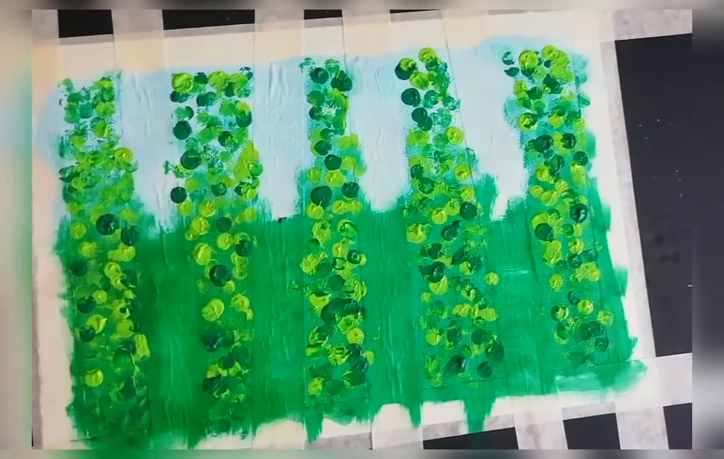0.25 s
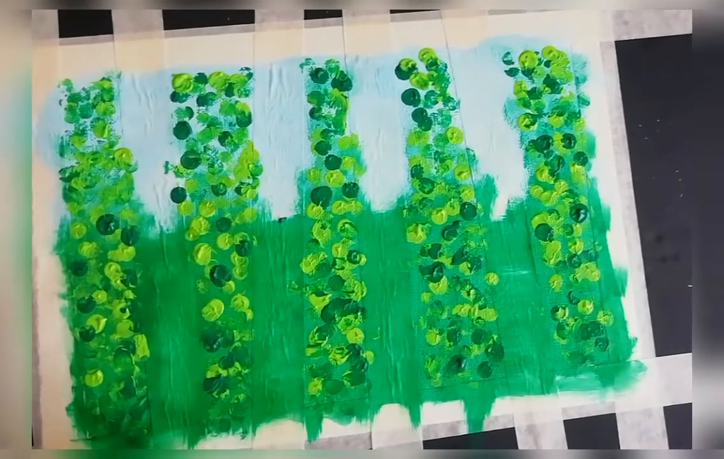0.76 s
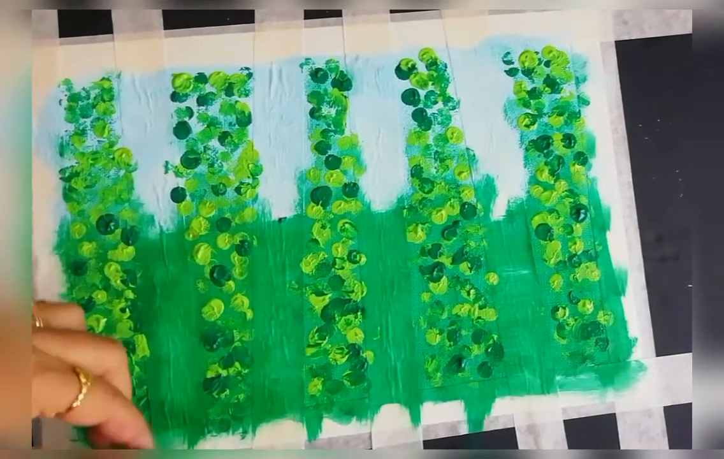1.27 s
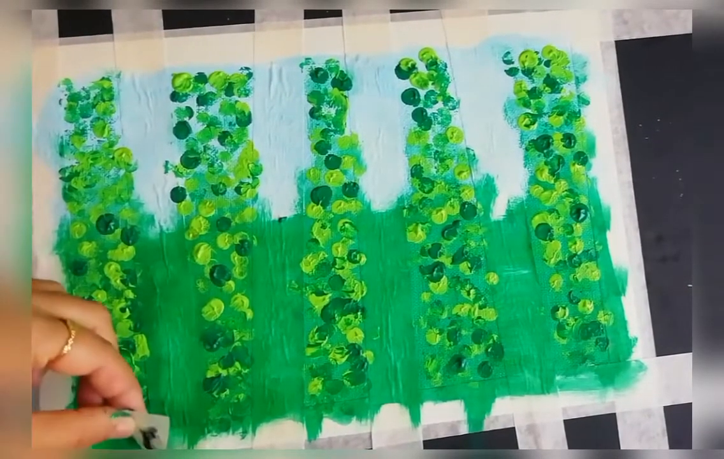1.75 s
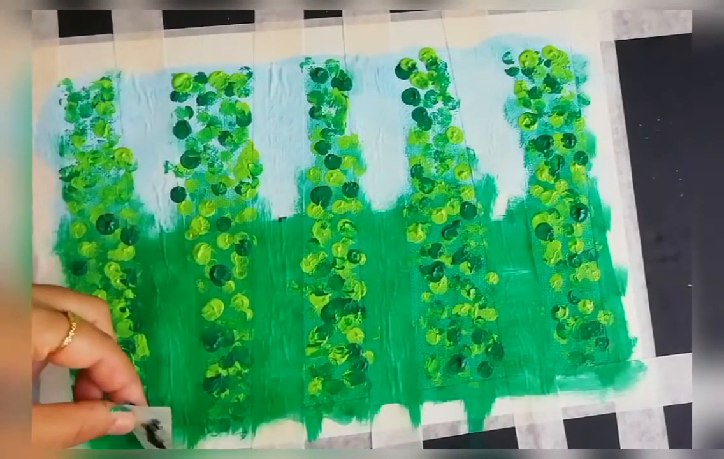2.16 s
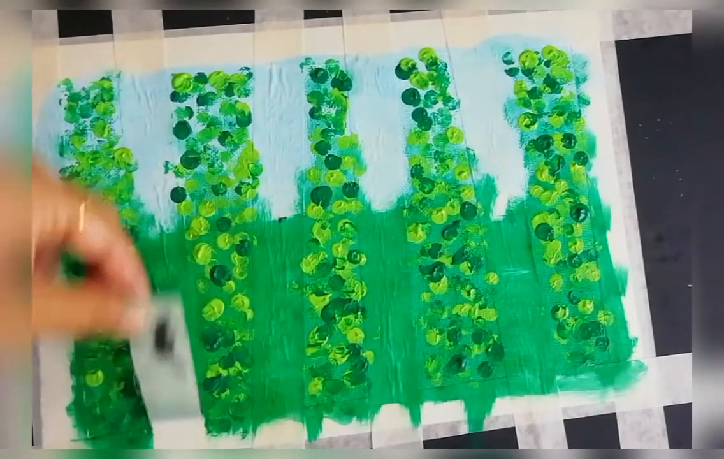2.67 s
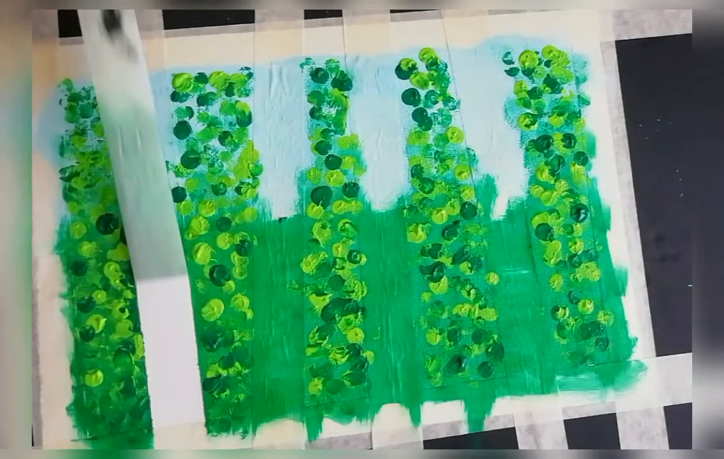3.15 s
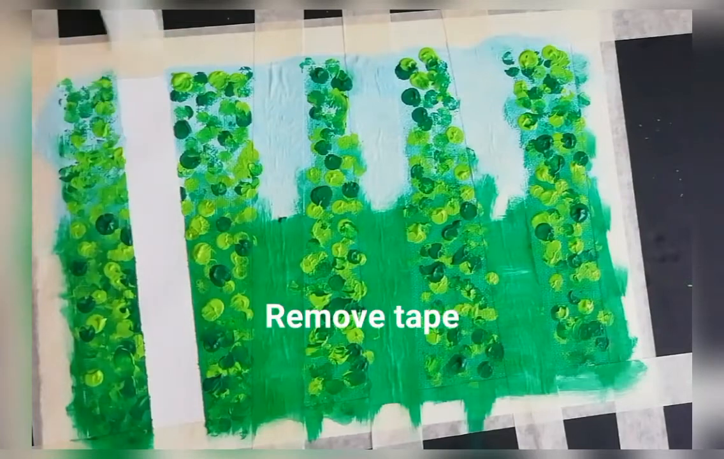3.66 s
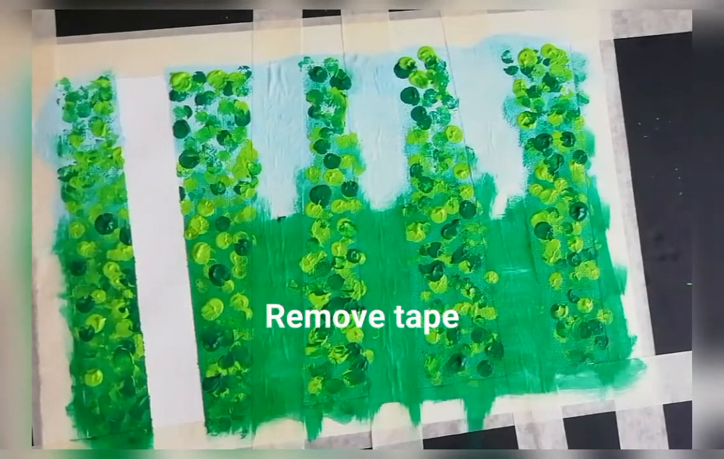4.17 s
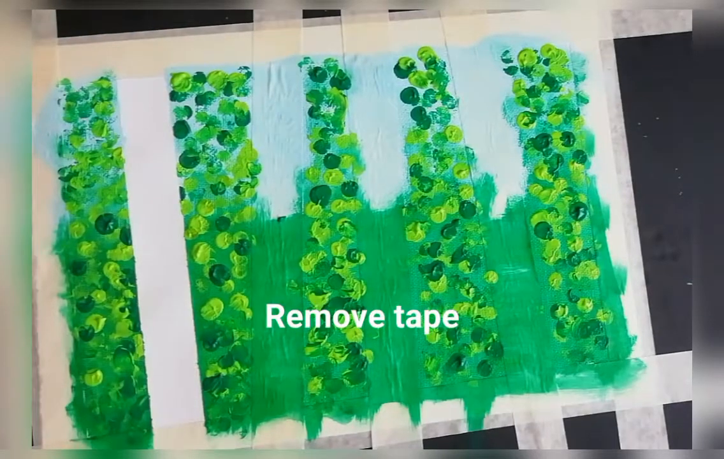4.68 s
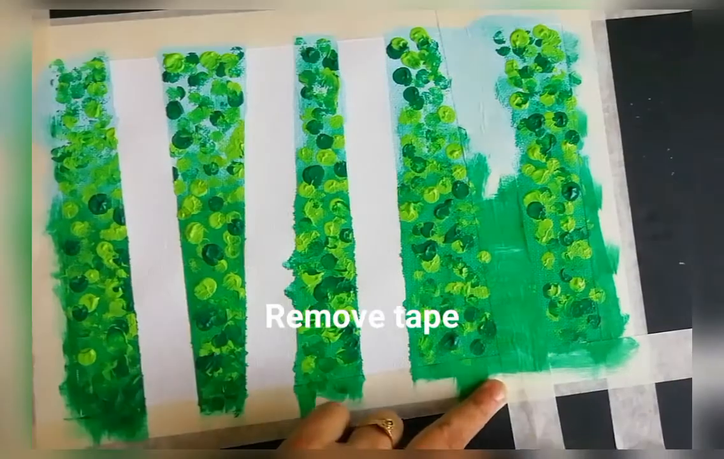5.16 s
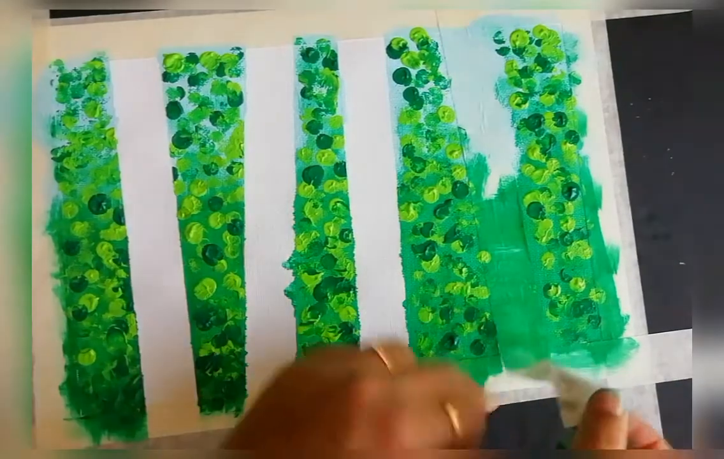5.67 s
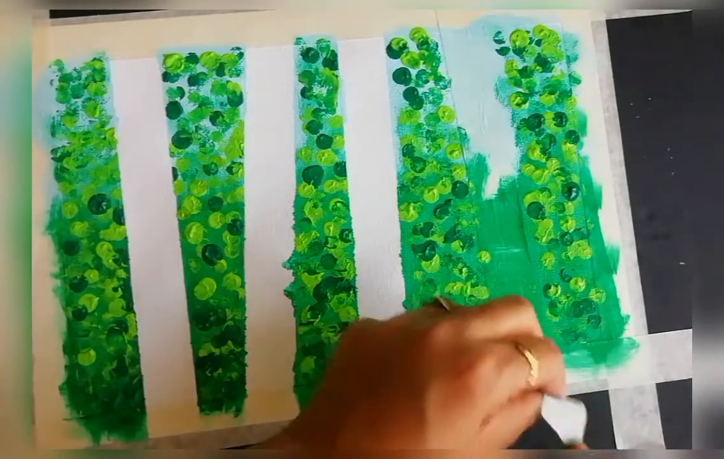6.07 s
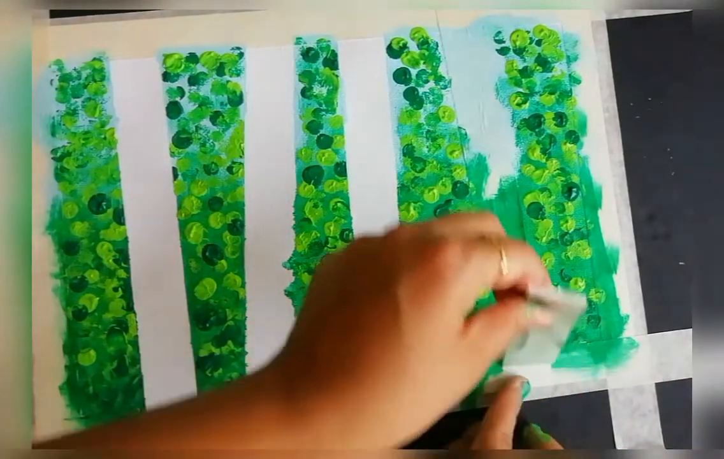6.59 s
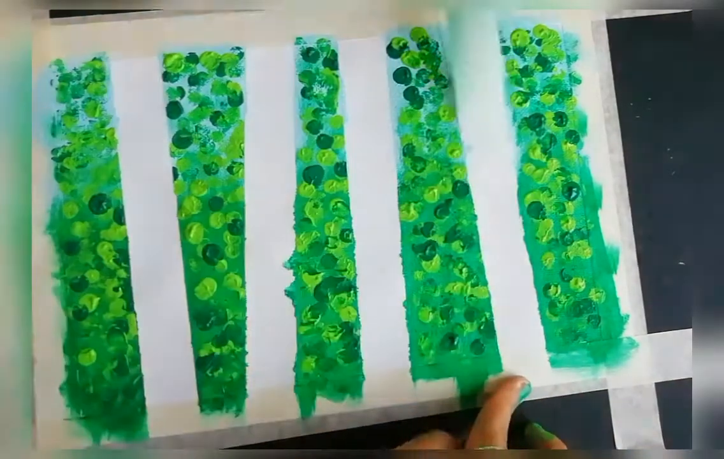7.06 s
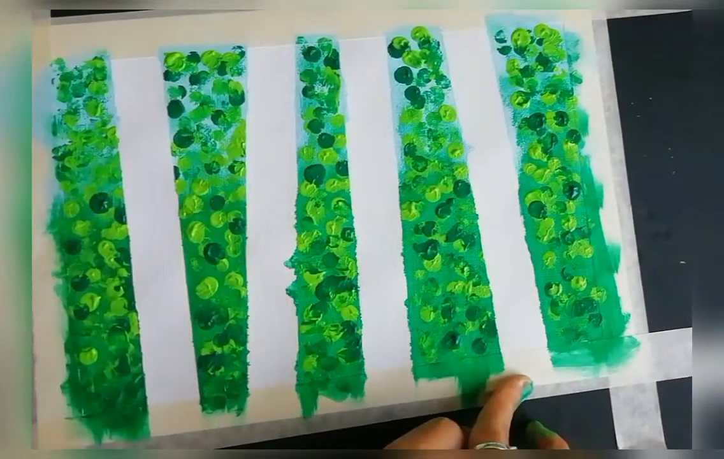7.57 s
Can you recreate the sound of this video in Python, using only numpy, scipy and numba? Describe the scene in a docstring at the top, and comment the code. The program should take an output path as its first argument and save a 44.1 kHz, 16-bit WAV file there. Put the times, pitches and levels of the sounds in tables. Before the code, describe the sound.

A close phone pickup of tape peeled from painted paper on a table in a small room, over quiet low rumble, hiss and faint wavering hum. From 0.25 to 0.8 s a grainy paper stroke swells into a tight cluster of crisp snaps and crinkle. Faint picking ticks and rubs follow from 1.4 to 2.1 s. At 2.6 s stronger snaps loosen the tape; from 2.9 to 3.8 s a long raspy, ringing peel grows faster and louder, ending in a bright crack and crinkle. Light rubbing and a soft double knock come near 4.4 s. A stroke swells from 5.0 s into sharp snaps at 5.4 s. Small ticks and knocks occur from 6.1 to 6.8 s. From 6.85 to 7.33 s a shorter, louder rip accelerates over dull board rumble; the freed strip rustles until 7.5 s, with a final knock and snap, then faint crinkling.

```python
"""A small room, at a table: masking tape is picked loose and ripped off a painted sheet, close to a phone.
Tiny slips of the glue, drawn at random, ring the taut strip and spit treble; a faster pull slips more often.
Corners snap free in single cracks, loose tape crinkles in runs of them, and the board is knocked dully.
Strokes over the paper hiss as grainy noise, sheet and board rumble low and dull under the hands, and the
freed strip rustles. Two microphone ports hear it over room rumble, hiss and a faint, wavering mains hum."""
import sys
import numpy as np
from scipy import signal
from scipy.fft import rfft, irfft
from scipy.io import wavfile
from scipy.ndimage import uniform_filter1d, map_coordinates
from numba import njit

SR = 44100
rng = np.random.default_rng(int(sys.argv[2]) if len(sys.argv) > 2 else 0)


def pcm_store(signal):
    """Save signal as 16-bit PCM."""
    levels = np.round(np.clip(np.atleast_2d(signal), -1, 1) * 32767)
    wavfile.write(sys.argv[1], SR, levels.astype(np.int16).T)


N = 345303
TIME = np.arange(N) / SR


def undb(db):
    """Decibels to gain."""
    return 10 ** (np.asarray(db) / 20)


def track(rows):
    """The columns of a curve after its time column, interpolated to one value a sample."""
    s, *columns = np.transpose(rows)
    return [np.interp(TIME, s, c) for c in columns]


def colour(x, points, unit=True, size=2048):
    """Causal minimum-phase filter through f/Hz, level/dB points; with unit, white noise keeps its power."""
    hz, db = np.transpose(points)
    bins = np.maximum(np.fft.rfftfreq(size, 1 / SR), 1)
    log_gain = np.log(undb(np.interp(np.log(bins), np.log(hz), db)))
    # folding the cepstrum onto positive times makes the filter causal
    cepstrum = irfft(log_gain)
    cepstrum[1:size // 2] *= 2
    cepstrum[size // 2 + 1:] = 0
    response = irfft(np.exp(rfft(cepstrum)))
    if unit:
        response /= np.linalg.norm(response)
    return signal.oaconvolve(np.atleast_2d(x), response[None], axes=1)[:, :N]


def noise(likeness):
    """White noise at the two ports; likeness is the share of power common to both."""
    share = np.clip(likeness, 0, 1)
    common = rng.standard_normal(N)
    separate = rng.standard_normal((2, N))
    return np.sqrt(share) * common + np.sqrt(1 - share) * separate


def waver(size):
    """Slow chance with a spread of 1, turning about every size samples."""
    slow = uniform_filter1d(uniform_filter1d(rng.standard_normal(N), size), size)
    return (slow - slow.mean()) / slow.std()


def slips(per_s, scatter_db, count=2400):
    """Random releases of unequal size, their power evened out over count samples as by a steady hand."""
    released = rng.random(N) < per_s / SR
    size = undb(scatter_db * np.clip(rng.standard_normal(N), -2, 2))
    power = released * size ** 2
    return np.sqrt(power / np.maximum(uniform_filter1d(power, count), 1e-9))


def linger(pulses, decay_s):
    """Envelope of the brief burst that follows each release; its amplitude falls to 1/e in decay_s."""
    keep = np.exp(-2 / (decay_s * SR))
    return np.sqrt(signal.lfilter([1 - keep], [1, -keep], pulses ** 2 + 1e-18))


def strike(s, rise_s, decay_s, count=4000):
    """Samples around a blow and its envelope: a quick exponential rise, then a decay."""
    at = np.clip(int(s * SR) + np.arange(-count // 10, count), 0, N - 1)
    t = TIME[at] - s
    return at, np.exp(np.minimum(t / rise_s, -t / decay_s))


def gestures(rows, attack_s, release_s, bend=1):
    """Gain of hand movements: each sets in, swells to its final level (early, if bent) and dies away."""
    gain = np.zeros(N)
    for start, end, final_db, swell_db in rows:
        at = slice(max(int(start * SR), 0), int((end + 10 * release_s) * SR))
        t = TIME[at]
        to_go = np.clip((end - t) / (end - start), 0, 1)
        attack = np.clip((t - start) / attack_s, 0, 1)
        release = np.exp(-np.maximum(t - end, 0) / release_s)
        gain[at] += attack * release * undb(final_db - swell_db * to_go ** bend)
    return gain


@njit
def moving_bandpass(x, hz, width):
    """State-variable band-pass with a moving centre."""
    y, band, low = np.empty(len(x)), 0., 0.
    for i in range(len(x)):
        g, damping = np.tan(np.pi * hz[i] / SR), width / hz[i]
        v = (band + g * (x[i] - low)) / (1 + g * (g + damping))
        band, low = 2 * v - band, low + 2 * g * v
        y[i] = damping * v
    return y


def resonate(x, hz, width_hz):
    """A moving resonance on both channels; white noise keeps its power."""
    filtered = np.array([moving_bandpass(c, hz, float(width_hz)) for c in x])
    return filtered * np.sqrt(SR / (np.pi * width_hz))


def narrow_bass(x, below_hz):
    """Long waves reach both ports alike."""
    high_pass = signal.butter(2, below_hz, "high", fs=SR, output="sos")
    side = signal.sosfilt(high_pass, (x[0] - x[1]) / 2)
    return x.mean(axis=0) + np.array([side, -side])


# spectrum of the empty room's rumble and air: f/Hz, level/dB
AIR_SPECTRUM = [(15, -34.5), (25, -8), (53, -4.5), (71, -14), (101, -8), (129, -21.5), (173, -13),
                (233, -21.5), (457, -35), (509, -37.5), (1200, -31.5), (2420, -36), (3170, -38),
                (15500, -51)]
# course of the upper hum tone, before a 2 dB lift: t/s, level/dB
HUM_COURSE = [(0.0, -66), (0.94, -63), (1.24, -89), (1.46, -61), (3.86, -64), (4.27, -82), (4.36, -54.5),
              (4.69, -66), (5.28, -53.5), (6.0, -75.5), (6.28, -64), (7.22, -71), (7.28, -59), (7.83, -63)]


def background():
    """Low room rumble, microphone hiss, and mains hum as two sines near 49 and 98 Hz, wavering in pitch."""
    air = narrow_bass(colour(noise(0), AIR_SPECTRUM, size=8192), below_hz=340)
    mains_hz = 49 + 25 * uniform_filter1d(rng.standard_normal(N), 4000)
    phase = 2 * np.pi * np.cumsum(mains_hz) / SR
    hum = undb(track(HUM_COURSE)[0] + 2) * np.sin(2 * phase) + undb(-65.5) * np.sin(phase)
    hiss = colour(noise(0), [(2000, -8), (8000, -8), (12000, 2), (15000, 0)])
    return undb(-62) * air + hum + undb(-76.5) * hiss


# strokes of fingers and loose tape over the paper, before a 3 dB cut:
# start t/s, end t/s, final level/dB, swell/dB (negative: fades)
STROKES = [(0.01, 0.2, -71, -13), (0.25, 0.815, -41, 29), (1.37, 1.56, -54.5, 21), (1.62, 1.78, -62, 5),
           (1.94, 2.12, -68, -1), (2.46, 2.58, -61, 17), (2.578, 2.88, -45.5, 0), (3.81, 3.93, -40.5, 1),
           (4.17, 4.33, -62, 11), (4.35, 4.405, -38.5, 12), (4.58, 4.62, -55.5, 3),
           (4.845, 5.05, -60.5, -2), (5.01, 5.42, -30.5, 28), (6.1, 6.26, -54.5, 14), (6.3, 6.68, -62, 1),
           (6.73, 6.78, -42.5, 0), (7.33, 7.55, -42.5, -14), (7.58, 7.79, -57.5, -1)]
# spectrum of the rubbed paper: f/Hz, level/dB
PAPER_SPECTRUM = [(300, -19.5), (700, -20.5), (1300, -13), (1900, -10.5), (2800, -2.5), (4000, -4.5),
                  (6300, -0.5), (7900, -8), (10000, -4.5), (13300, -5), (14800, 8), (15600, -19)]


def sliding():
    """Paper fibres catch and let go: a fine, grainy hiss; each stroke eases in and out."""
    stroke = gestures(STROKES, attack_s=.015, release_s=.015, bend=2.03)
    stroke = uniform_filter1d(stroke, size=1000)
    grain = linger(slips(3500, scatter_db=2), decay_s=.0006)
    return undb(-3) * colour(stroke * grain * noise(.21), PAPER_SPECTRUM)


# snaps of glue and creases, levels relative to their layers: t/s, crack level/dB, body level/dB
SNAP_EVENTS = [(0.283, -49.5, -75), (0.763, -29.5, -53), (0.7827, -23, -44), (0.787, -20.5, -44),
               (0.8, -30, -42), (0.812, -26, -36), (0.837, -20.5, -48), (1.4229, -52, -50.5),
               (1.4876, -42, -54), (1.551, -28, -51), (1.685, -44, -62), (1.715, -41.5, -52.5),
               (1.953, -56, -58.5), (2.5849, -23, -27.5), (2.652, -26.5, -35), (2.6774, -29, -28.5),
               (2.6921, -26, -30.5), (2.736, -28, -34), (2.7597, -25.5, -25.5), (3.075, -24.5, -24),
               (3.1428, -25, -32), (3.295, -26, -26), (3.4065, -22, -24), (3.5164, -27, -21),
               (3.694, -23, -27), (3.7887, -14.5, -18), (3.8093, -20.5, -37), (4.364, -46, -50),
               (4.402, -28.5, -49), (5.3759, -13, -37.5), (5.3855, -17, -30), (5.4078, -35, -22),
               (5.4235, -31, -20), (6.079, -50.5, -69.5), (6.1826, -39, -65), (6.2568, -26, -47),
               (6.2599, -20, -50), (6.694, -37, -40.5), (6.7398, -46, -39.5), (6.9227, -31, -19.5),
               (7.316, -28, -24), (7.5436, -33.5, -25.5)]
# spectrum of a crisp crack, also for crinkles: f/Hz, level/dB
CRISP_SPECTRUM = [(1180, -27.5), (2000, -18), (2370, -7), (3180, -2.5), (3460, -6), (5790, -1),
                  (6640, -1.5), (7680, -6.5), (13100, -1), (14600, -1.5), (15500, 3.5)]
# spectrum of the tape's backing, also for crinkles: f/Hz, level/dB
BODY_SPECTRUM = [(150, -19), (420, -24.5), (600, -22.5), (1100, -12.5), (1500, -6), (2200, 4.5),
                 (3000, 3.5), (4500, -6), (9000, -50.5)]
# spectrum of sizzle from the tape's thin edge, also for crinkles: f/Hz, level/dB
EDGE_SPECTRUM = [(8000, -36.5), (12000, -9), (14700, 9.5), (16000, -12)]
# the less body a snap has, the more its edge sizzles (dB per dB of crack over body)
SNAP_EDGE_DB, THIN_SHARE = -17, .5


def snapping():
    """Single snaps: a crack runs for about a millisecond, jerks the backing once and leaves a brief shiver."""
    cracks, shivers, ticks, jerks, edges = np.zeros((5, N))
    millisecond = np.sqrt(SR / 1000)  # gives one sample the energy of a millisecond at unit level
    for s, crack_db, body_db in SNAP_EVENTS:
        at, crack = strike(s, rise_s=.0007, decay_s=.0007)
        _, shiver = strike(s, rise_s=.0005, decay_s=.0062)
        cracks[at] += undb(crack_db) * (crack + undb(-20) * shiver)
        shivers[at] += undb(body_db - 7.5) * shiver
        onset = int(s * SR)
        ticks[onset] += undb(crack_db) * millisecond
        jerks[onset] += undb(body_db) * millisecond
        edge_db = crack_db + SNAP_EDGE_DB + THIN_SHARE * (crack_db - body_db)
        edges[onset] += undb(edge_db) * millisecond
    crisp = undb(4) * cracks * noise(.4) + undb(-3) * ticks
    body = undb(-1) * jerks + shivers * noise(.2)
    return colour(crisp, CRISP_SPECTRUM) + colour(body, BODY_SPECTRUM) + colour(edges, EDGE_SPECTRUM)


# dull low rumble of the sheet and board as hands rub, tug and lift, before a 3 dB cut:
# start t/s, end t/s, final level/dB, swell/dB (negative: fades)
RUMBLES = [(0.58, 0.83, -54.5, 13), (1.45, 1.68, -66, 4), (2.58, 2.87, -65, 3), (2.88, 2.96, -57, 0),
           (2.97, 3.7, -52.5, -1), (3.7, 3.81, -45.5, 4), (3.83, 3.93, -54, 2), (4.35, 4.41, -46, 2),
           (4.84, 5.2, -65, 3.5), (5.2, 5.38, -44, 5.5), (5.38, 5.52, -56.5, -7.5), (6.25, 6.6, -65.5, 1.5),
           (6.87, 7.03, -40, 8), (7.05, 7.27, -50, -4), (7.27, 7.54, -38.5, 7.5)]
# spectrum of the rumbling sheet and board: f/Hz, level/dB
RUMBLE_SPECTRUM = [(22, -14), (50, 2.5), (90, -4), (160, 4.5), (280, -4), (420, -6.5), (600, -10),
                   (1000, -10), (2000, -47.5)]
# the freed strip trails away, before its two parts are mixed:
# start t/s, end t/s, final level/dB, swell/dB (negative: fades)
STRIP_TRAIL = [(7.275, 7.5, -36, -3)]
# spectrum of the loose strip: f/Hz, level/dB
LOOSE_SPECTRUM = [(100, -14), (200, -17), (420, -2.5), (800, -8), (1500, -10), (3000, -8), (6000, -36)]
TRAIL_HZ, TRAIL_SAG_HZ_PER_S = 540, 720


def rumbling_and_trailing():
    """Sheet and board rumble dully under the hands; the freed strip rustles with a sinking resonance."""
    flutter = linger(slips(600, scatter_db=3), decay_s=.005)
    handled = gestures(RUMBLES, attack_s=.025, release_s=.022)
    rumble = colour(handled * flutter * noise(1), RUMBLE_SPECTRUM)
    drag = gestures(STRIP_TRAIL, attack_s=.013, release_s=.008) * flutter
    start, end, _, _ = STRIP_TRAIL[0]
    hz = TRAIL_HZ - TRAIL_SAG_HZ_PER_S * (np.clip(TIME, start, end) - start)
    hollow = resonate(drag * noise(.34), hz, width_hz=370)
    rustle = colour(drag * noise(.95), LOOSE_SPECTRUM)
    return undb(-3) * rumble + undb(-11) * hollow + undb(-5.5) * rustle


# crinkles, where a short piece of tape tears free: start t/s, end t/s, crisp level/dB,
# body level/dB and sizzle level/dB (both relative to crisp), fade over its length/dB (negative: swells)
CRINKLE_RUNS = [(0.781, 0.841, -34, -9.5, -12, 4.5), (1.375, 1.402, -60, -14, -15, 17),
                (1.475, 1.55, -52.5, -11, -2, -6), (1.549, 1.564, -44.5, -3, 7, 6),
                (1.71, 1.822, -58.5, -17, -10, 6), (2.556, 2.58, -52.5, -10, 3, -6),
                (2.667, 2.717, -37, -6.5, -2, 1), (2.721, 2.89, -49, -2, -12, -6),
                (3.739, 3.81, -24.5, -10, -14, 2.5), (4.201, 4.36, -66, 1.5, 3, -14),
                (4.357, 4.401, -44.5, -1.5, 5, -12), (4.847, 4.948, -63, 0.5, -13, 6.5),
                (5.2, 5.376, -43, -3, -20.5, -1.5), (5.375, 5.482, -29.5, -4.5, -12, 11.5),
                (6.148, 6.26, -56, -30, 0, 0), (6.468, 6.693, -64.5, 1, -4, 0),
                (6.733, 6.802, -44, -5, -12, -2), (7.293, 7.336, -26.5, -11, -5.5, 1),
                (7.531, 7.555, -47.5, 5.5, 15, -6), (7.603, 7.797, -66, 2, -12, 2)]


def crinkling():
    """Short runs of sharp cracks: crisp, with body from the tape's backing and sizzle from its thin edge."""
    crisp, body, sizzle = np.zeros((3, N))
    for start, end, db, body_db, sizzle_db, fade_db in CRINKLE_RUNS:
        at = (TIME >= start) & (TIME < end)
        crisp[at] = undb(db - fade_db * np.linspace(-.5, .5, at.sum()))
        body[at] = crisp[at] * undb(body_db)
        sizzle[at] = crisp[at] * undb(sizzle_db)
    cracks = linger(slips(1500, scatter_db=3.5), decay_s=.0006)
    crackle = colour(crisp * cracks * noise(.16), CRISP_SPECTRUM)
    backing = colour(body * cracks * noise(.61), BODY_SPECTRUM)
    edge = colour(sizzle * cracks * noise(.5), EDGE_SPECTRUM)
    return crackle + backing + edge


# soft knocks of hand and tape on the board, each sounding 2 ms after its time:
# t/s, level/dB of the rattle's peak envelope before the board colours it
KNOCK_EVENTS = [(0.783, -45), (1.55, -55), (4.382, -44), (4.4, -46), (6.258, -48), (6.406, -45.5),
                (6.455, -54), (7.541, -32.5)]
# spectrum of the board: f/Hz, level/dB
BOARD_SPECTRUM = [(25, 1), (60, 0), (130, 2.5), (400, -6), (600, -3.5), (1000, 1), (1600, 6), (2500, -26),
                  (6000, -57)]


def knocking():
    """Dull, short bumps of the board: one push and a brief rattle."""
    push, rattle = np.zeros((2, N))
    for s, db in KNOCK_EVENTS:
        hit_s = s + .002
        at, blow = strike(hit_s, rise_s=.0005, decay_s=.004)
        rattle[at] += undb(db) * blow
        push[int(hit_s * SR)] += undb(db + 18.5)
    return colour(push + rattle * noise(1), BOARD_SPECTRUM)


# long pulls, slow at first, then ever faster, before tugs and jerks:
# start t/s, takes hold t/s, end t/s, final ring level/dB, final glue crackle level/dB, swell/dB,
# strip resonance at the start f/Hz
LONG_PULLS = [(2.876, 2.98, 3.812, -31.3, -34.7, 7, 2370), (6.838, 6.917, 7.33, -21.5, -28, 10.5, 2196)]
# the hand tugs or eases off within a pull: start t/s, end t/s, extra level/dB
HAND_TUGS = [(2.885, 2.934, 3), (2.98, 3.027, 3), (3.2, 3.362, -2.5), (3.732, 3.79, 3), (7.105, 7.18, 2)]
TAKE_UP_DB = -5  # until the pull takes hold
JERK_DB = .83  # spread of the hand's uneven pull
PULL_ATTACK_S, RING_RELEASE_S, GLUE_RELEASE_S = .015, .0062, .00155
SLACK_S = .037  # the strip goes slack and its ring starts to die this long before the glue lets go
SAG_HZ_PER_S = 600  # the freed strip lengthens and its resonance sinks, before tugs shift it
TAUTNESS = .2  # a harder tug tightens the strip: its resonance rises with this power of the force


def pulling():
    """Ring and crackle gains and strip resonance, as each pull takes hold, speeds up and goes slack."""
    ring, glue = np.zeros((2, N))
    hz = np.full(N, float(LONG_PULLS[0][-1]))
    tug_db = JERK_DB * waver(size=700)
    for start, end, db in HAND_TUGS:
        tug_db += db * ((TIME >= start) & (TIME < end))
    tug = undb(tug_db)
    for start, hold, end, ring_db, glue_db, swell_db, strip_hz in LONG_PULLS:
        grip = tug * np.where(TIME < hold, undb(TAKE_UP_DB), 1)
        ring_row = (start, end - SLACK_S, ring_db, swell_db)
        ring += grip * gestures([ring_row], PULL_ATTACK_S, RING_RELEASE_S, bend=1.5)
        glue_row = (start, end, glue_db, swell_db)
        glue += grip * gestures([glue_row], PULL_ATTACK_S, GLUE_RELEASE_S)
        sagging = strip_hz - SAG_HZ_PER_S * (np.minimum(TIME, end) - start)
        hz = np.where(TIME < start, hz, sagging)
    return ring, glue, hz * tug ** TAUTNESS


def spread_to_ports(pulses, spread_s):
    """Each release comes from its own spot across the tape, so reaches the right port at its own time."""
    at = np.flatnonzero(pulses)
    lag = spread_s * SR * rng.standard_normal(N)[at]
    arrival = np.clip(at + np.round(lag).astype(int), 0, N - 1)
    return np.array([pulses, np.bincount(arrival, pulses[at], N)])


# spectrum of the ringing strip: f/Hz, level/dB
STRIP_SPECTRUM = [(290, -49.5), (500, -27.5), (558, -27), (1070, -23), (2040, 2.5), (2240, 4), (2520, -2),
                  (3170, -11.5), (3610, -42.5), (4500, -20), (5850, -46.5), (9900, -120)]
# spectrum of the breaking glue: f/Hz, level/dB
GLUE_SPECTRUM = [(1760, -39.5), (3000, 1), (4000, -5), (6480, -3), (7130, -2.5), (7800, -10), (8950, -5),
                 (13700, -4), (14700, 1), (15500, -2.5)]


def peeling():
    """Stick and slip along the peel line: a faster pull slips more; each slip rings the strip, spits treble."""
    ring_gain, glue_gain, hz = pulling()
    pulses = slips(820 * (ring_gain / undb(-35)) ** .7, scatter_db=4.2)
    kicks = spread_to_ports(pulses, spread_s=.00002)
    taut = resonate(colour(kicks, [(500, -14), (1500, 0)]), hz, width_hz=480)
    ring = colour(kicks, STRIP_SPECTRUM) + undb(-7) * taut
    # some slips crack brightly, others only thump the strip
    brightness = undb(3 * np.clip(rng.standard_normal(N), -2, 2) - 2)
    threads = linger(pulses * brightness, decay_s=.0005) * noise(.3)
    fizz = linger(slips(4000, scatter_db=3), decay_s=.0003) * noise(.2)
    return ring_gain * ring + glue_gain * colour(threads + fizz, GLUE_SPECTRUM)


# where the hands work: t/s, lead of the left port/s (negative: the right port leads)
HAND_SPOT = [(0, 0), (2.5, -.00003), (3.6, -.00008), (4.4, -.00008), (4.8, .00015), (6.6, .00015),
             (7.5, .0001)]


def place(x):
    """The nearer port hears the hands a little sooner."""
    late = np.arange(N) - track(HAND_SPOT)[0] * SR
    return np.array([x[0], map_coordinates(x[1], [late], order=3)])


def room(x, t60_s, treble_t60_s, wet_db, count=26000):
    """A diffuse tail, 4 ms after the direct sound; its top is weaker and dies sooner."""
    t = np.arange(count) / SR
    low_pass = signal.butter(3, 8500, fs=SR, output="sos")
    high_pass = signal.butter(3, 8500, "high", fs=SR, output="sos")
    low = signal.sosfilt(low_pass, rng.standard_normal((2, count)))
    high = signal.sosfilt(high_pass, rng.standard_normal((2, count)))
    low *= np.exp(-np.log(1000) * t / t60_s)
    high *= np.exp(-np.log(1000) * t / treble_t60_s)
    tail = (low + undb(-6) * high) * (t > .004)
    tail *= undb(wet_db) / np.linalg.norm(tail, axis=1, keepdims=True)
    wet = signal.oaconvolve(x, tail, axes=1)[:, :N]
    return x + narrow_bass(wet, below_hz=170)


# the tabletop colours everything that happens on it: f/Hz, level/dB
TABLETOP_RESPONSE = [(140, 1), (210, 2.5), (290, -1.5), (420, 3.5), (560, -4.5), (800, 1), (1100, 2),
                     (1350, 0), (1800, -0.5)]


def scene():
    """All the handling sounds on the table, in the room, over its background."""
    handling = sliding() + snapping() + rumbling_and_trailing() + crinkling() + knocking() + peeling()
    handling = place(colour(handling, TABLETOP_RESPONSE, unit=False))
    return background() + room(handling, t60_s=.44, treble_t60_s=.38, wet_db=-9.5)


# the left microphone port: f/Hz, level/dB
LEFT_RESPONSE = [(500, 0), (2300, -1.5), (5000, 2), (8000, -1.5), (11000, 2), (15000, 3.5)]
# the right microphone port: f/Hz, level/dB
RIGHT_RESPONSE = [(500, 0.5), (2300, -2.5), (4800, 1.5), (6600, 4.5), (8500, 0), (11000, -3.5),
                  (15000, -17)]
TOP_HZ = 15400


def record(dry):
    """The left port is bright, the right one shaded; the phone cuts the top."""
    left = colour(dry[0], LEFT_RESPONSE, unit=False)
    right = colour(dry[1], RIGHT_RESPONSE, unit=False)
    top_cut = signal.ellip(8, .2, 70, TOP_HZ, fs=SR, output="sos")
    return signal.sosfilt(top_cut, np.vstack([left, right]))


dry = scene()
out = record(dry)
pcm_store(out)
```